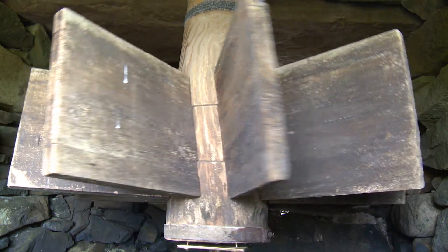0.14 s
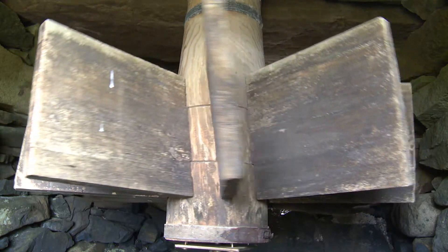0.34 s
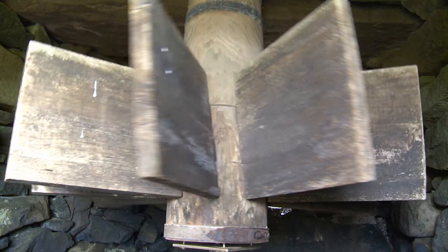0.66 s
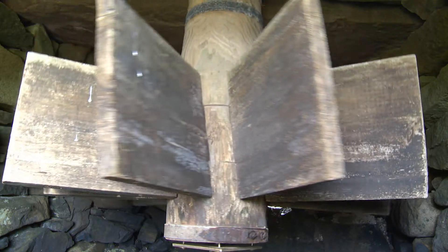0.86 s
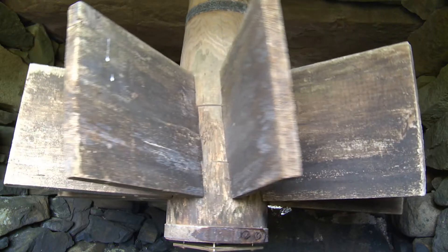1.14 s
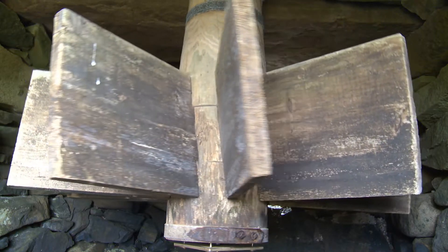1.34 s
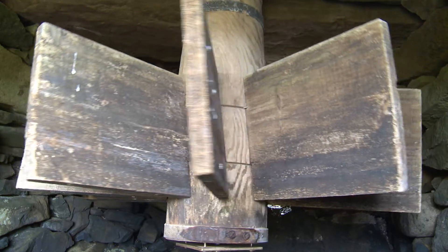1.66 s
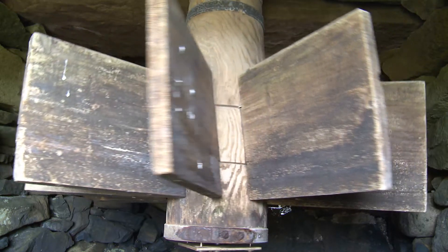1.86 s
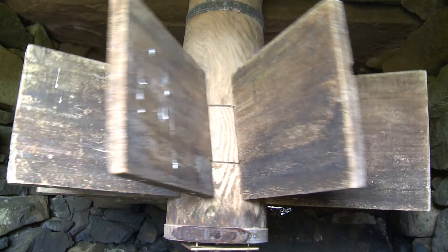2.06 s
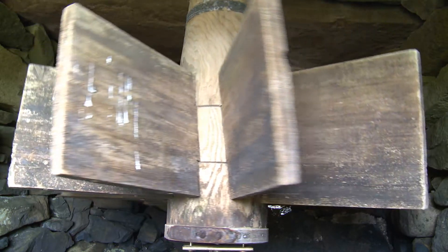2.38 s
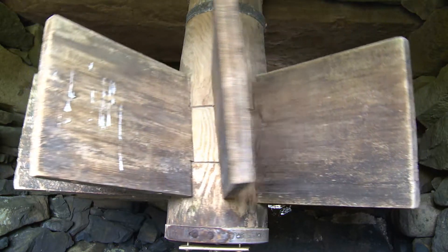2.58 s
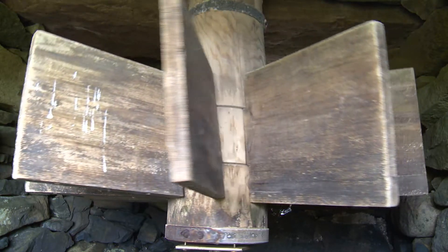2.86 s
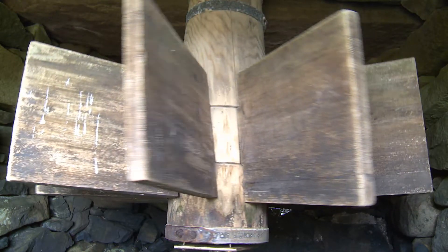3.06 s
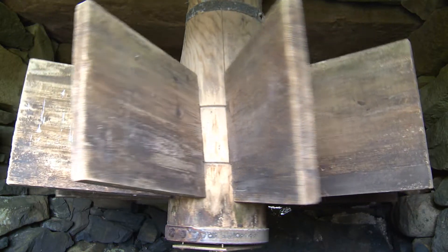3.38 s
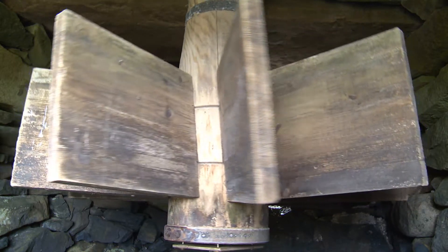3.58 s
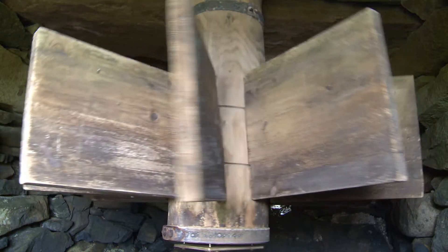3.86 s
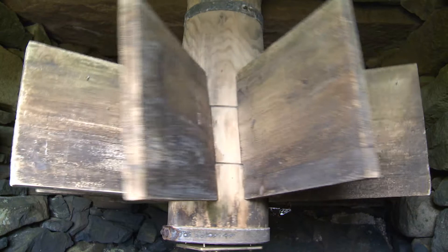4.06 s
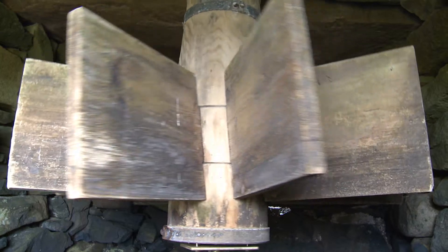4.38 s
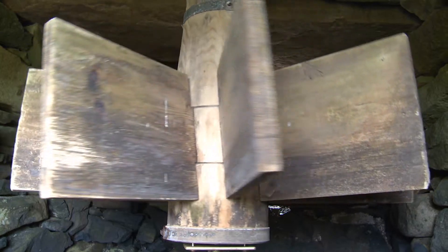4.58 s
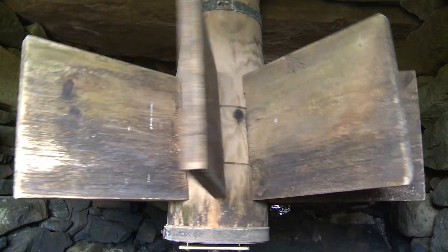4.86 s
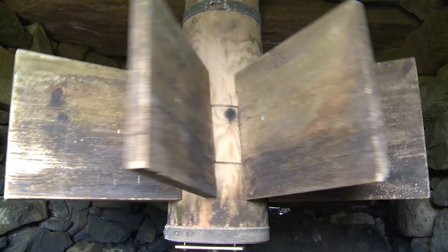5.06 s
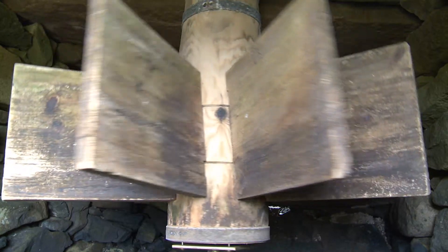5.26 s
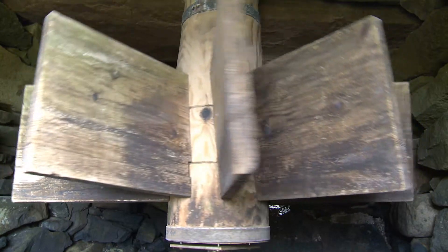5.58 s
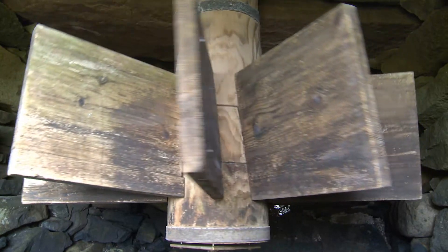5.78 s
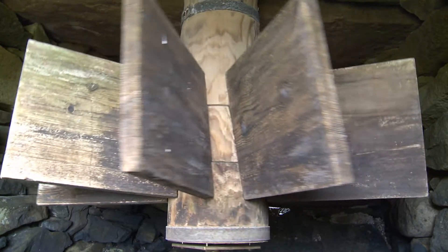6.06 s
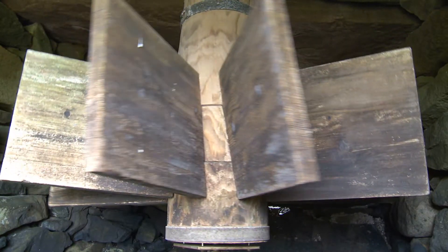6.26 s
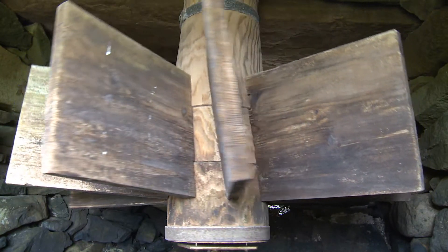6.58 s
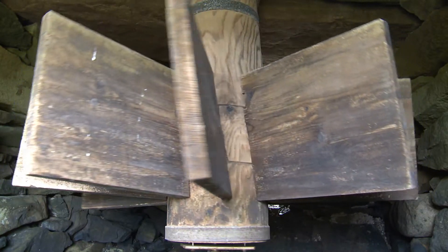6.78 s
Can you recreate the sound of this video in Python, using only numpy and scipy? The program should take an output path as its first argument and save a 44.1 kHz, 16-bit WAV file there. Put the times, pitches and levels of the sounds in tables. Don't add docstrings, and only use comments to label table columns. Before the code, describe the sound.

Under a stone mill, a stream runs continuously past a wooden paddle wheel. Rounded bubbles plop and plink over a steady gurgling rush, with small bright drips and faint spray ticks. A hollow low hum swells and gulps irregularly. Deep wind thumps buffet the bare, close microphone, strongest around the middle. Stone walls add short dull echoes; no wheel creak is heard.

```python
import sys
import numpy as np
from scipy import signal
from scipy.fft import rfft, irfft, next_fast_len
from scipy.io import wavfile
from scipy.ndimage import uniform_filter1d

SR = 44100
rng = np.random.default_rng(int(sys.argv[2]) if len(sys.argv) > 2 else 0)


def linear_from_db(decibels):
    return 10 ** (np.asarray(decibels, float) / 20)


def dump_mix(stems):
    frames = np.atleast_2d(stems).T
    limited = np.clip(frames, -1, 1)
    pcm = np.round(limited * 32767).astype(np.int16)
    wavfile.write(sys.argv[1], SR, pcm)


N = 305524

# pitch_hz, density_db (dB per Hz)
GURGLE_COLOUR = [(140, -13), (240, 3), (311, -10), (443, -6), (530, -12), (729, -8.5), (844, -12),
                 (956, -10.5), (1190, -15), (1410, -13), (2290, -21), (3600, -36), (4680, -39.5),
                 (7920, -120)]


def rms_one(x):
    return x / np.sqrt(np.mean(x ** 2) + 1e-20)


def in_time(rows):
    s, *columns = np.transpose(rows)
    return [np.interp(np.arange(N) / SR, s, column) for column in columns]


def at_hz(points, hz):
    points = np.array(points)
    return np.interp(np.log(hz), np.log(points[:, 0]), points[:, 1])


def filtered(x, order, edge_hz, kind="band"):
    return signal.sosfilt(signal.butter(order, edge_hz, kind, fs=SR, output="sos"), x)


def bumps(when_s, change_db, length_s):
    t = np.arange(0, N + 40, 40) / SR
    total = 0
    for s, db, wide in np.broadcast(when_s, change_db, length_s):
        total = total + db * np.exp(-.5 * ((t - s) / wide) ** 2)
    return np.interp(np.arange(N) / SR, t, total)


def drift(rate):
    r = np.exp(-80 * np.pi * rate / SR)
    slow = signal.lfilter([1], [1, -2 * r, r * r], rng.standard_normal(N // 40 + 2002))[2000:]
    return np.interp(np.arange(N) / 40, np.arange(len(slow)), rms_one(slow))


def evened(x, span_s):
    size = int(span_s * SR)
    power = uniform_filter1d(uniform_filter1d(x ** 2, size=size), size=size)
    return rms_one(x / np.sqrt(power + .02 * power.mean()))


def shaped_noise(spectrum):
    size = next_fast_len(N)
    hz = np.maximum(np.arange(size // 2 + 1) * SR / size, 1)
    coloured = rfft(rng.standard_normal(size)) * linear_from_db(at_hz(spectrum, hz))
    return rms_one(irfft(coloured, size)[:N])


def ring(clicks, hz, t60):
    r, w = linear_from_db(-60 / (t60 * SR)), 2 * np.pi * hz / SR
    return signal.lfilter([0, np.sin(w)], [1, -2 * r * np.cos(w), r * r], clicks + 1e-18)


def strikes_at(events, trim_db):
    strikes = np.zeros(N)
    strikes[[round(s * SR) for s, db in events]] = linear_from_db(np.array(events)[:, 1] + trim_db)
    return strikes


def fading(strikes, t60):
    return signal.lfilter([1], [1, -linear_from_db(-60 / (t60 * SR))], strikes)


def bubbles(events, cycles, swell_cycles, rise, trim_db):
    out = np.zeros(N + SR)
    for (s, peak_db, hz), chance in zip(events, rng.standard_normal((len(events), 2))):
        turns = np.arange(int(1.5 * cycles / hz * SR)) / SR * hz
        shape = (1 - np.exp(-turns / swell_cycles)) * linear_from_db(-60 * turns / cycles)
        phase = turns * (1 + rise * (1 + .5 * chance[0]) * (turns / cycles - .2))
        height = linear_from_db(peak_db + trim_db) * np.sign(chance[1])
        i = round(s * SR)
        out[i:i + len(turns)] += height * shape / shape.max() * np.sin(2 * np.pi * phase)
    return out[:N]


def swarm(spectrum, low_hz, high_hz, per_s, cycles, spread_db, clump_db, count):
    sizes = linear_from_db(spread_db * np.minimum(rng.exponential(1, N), 3.5)) * rng.choice([-1, 1], N)
    born = rng.random(N) < per_s * linear_from_db(clump_db * drift(14)) / SR
    dealt = rng.integers(0, count, N)
    out = np.zeros(N)
    for k, hz in enumerate(np.geomspace(low_hz, high_hz, count)):
        struck = ring(sizes * born * (dealt == k), hz, cycles / hz)
        bubble = ring(struck, hz, 0.17 * cycles / hz)
        out += linear_from_db(at_hz(spectrum, hz)) * np.sqrt(hz) * rms_one(bubble)
    return rms_one(out)


def far_hiss():
    # start_s (middle), lift_db, length_s
    showers = [
        (0.92, 4, .02),
        (3.7, 5, .06),
        (3.87, 5, .04),
        (4.81, 5, 0.055),
        (5.08, 4, .04),
        (6.74, 4, .04),
    ]
    hiss = rms_one(filtered(rng.standard_normal(N), 2, 8000, "high"))
    return linear_from_db(-54.5 + bumps(*np.transpose(showers))) * hiss


def wind():
    # time_s, level_db
    gusts = [(0.0, -20), (0.56, -43), (0.81, -21.5), (1.47, -40), (1.64, -11), (2.37, -35), (2.66, -19),
             (3.03, -20), (3.11, -8), (3.49, -10), (3.65, -5.5), (4.25, -19.5), (4.3, -1), (4.48, -21),
             (4.69, -10.5), (5.86, -15.5), (6.27, -17), (6.93, -52)]
    # time_s, buffeting_change_db, flutter_change_db
    eddies = [(0.155, -9, -2), (0.74, -1, -11), (0.87, 3, 2), (1.37, -4, 12), (1.99, 13, 7), (2.115, 10, 0),
              (2.49, 10, 2), (2.7, 0, 6), (2.83, -7, -12), (3.01, -14, 5), (3.11, 4.5, -1), (3.28, -13, 4),
              (3.47, -9, -14), (3.56, -1, 3), (3.67, 11, -18), (3.84, 6, 0), (4.07, 7, 7), (4.14, 5, 3.5),
              (4.39, 7, -12), (4.6, 5, -13), (4.71, 8, -5), (4.78, 6, 2), (4.86, 10, -3), (5.0, 8.5, 12),
              (5.11, -25, 6.5), (5.19, 10, 3), (5.4, 0, 7), (5.46, -9, -1), (5.52, 14, 11.5), (5.64, -2, 9),
              (5.9, -14, 1), (6.079, 4, -7), (6.13, 4, 5.5), (6.35, 12.5, 10)]
    eddy_s = 0.026
    wind_db, = in_time(gusts)
    s, buffet_up_db, flutter_up_db = np.transpose(eddies)
    buffet_db = wind_db + bumps(s, buffet_up_db, eddy_s)
    flutter_db = -16 + 0.52 * wind_db + bumps(s, flutter_up_db, eddy_s)
    white = rng.standard_normal((2, N + SR))
    big = filtered(white[0], 3, [6, 28.7])[SR:]
    small = filtered(white[1], 1, (45.3, 93))[SR:]
    small = filtered(small, 2, 170, "low")
    push = linear_from_db(buffet_db - 3.5) * evened(big, 0.19) + linear_from_db(flutter_db - 3.0) * evened(small, 0.13)
    return .88 * np.tanh(push / .88)


def hollow():
    # time_s, change_db
    surges = [(0.19, 11), (0.48, 4), (0.54, -7), (0.65, 7), (1.14, -16), (1.23, 4.5), (1.33, -17),
              (1.54, 4.5), (1.775, -6), (1.836, 3), (2.2, 6), (2.29, -14), (2.95, 5.5), (3.05, 5.5),
              (3.1, -7), (3.26, 8), (3.41, -18), (3.53, 4), (3.71, 19), (3.83, -22), (3.9, 26), (3.97, 22),
              (4.19, 11), (4.23, -5), (4.395, 5), (4.73, 10), (5.0, 5.5), (5.33, 6), (5.46, 19), (5.61, -6),
              (5.73, 6.5), (5.86, 5), (6.02, 21), (6.105, -5), (6.17, 8), (6.33, 4), (6.39, -10),
              (6.455, 3), (6.6, -26)]
    hollow_hz, width_hz, surge_s = 196, 18.7, 0.026
    boom_db = -23.5 + bumps(*np.transpose(surges), surge_s)
    t60 = np.log(1000) / (np.pi * width_hz * 1.5)
    boom = ring(ring(rng.standard_normal(N), hollow_hz, t60), hollow_hz, t60)
    return linear_from_db(np.minimum(boom_db, -17) - 1.5) * evened(boom, 0.091)


def gulps():
    # start_s, peak_db, pitch_hz
    pockets = [
        (0.172, -7, 195),
        (1.371, -3.5, 189),
        (1.58, -6, 196),
        (3.868, -11.5, 223),
        (6.518, -10.5, 194),
    ]
    out = np.zeros(N + SR)
    t = np.arange(SR // 5) / SR
    for s, peak_db, hz in pockets:
        shape = np.clip(t / 0.005, 0, 1) * linear_from_db(-60 * np.maximum(t - .018, 0) / 0.077)
        out[round(s * SR) - 150:][:len(t)] += linear_from_db(peak_db) * shape * np.sin(2 * np.pi * hz * t)
    return out[:N]


def babble(count):
    when, size, strength = rng.random((count, 3)).T
    hz = 320 * 10.6 ** size
    level_db = at_hz(GURGLE_COLOUR, hz) + 9 * np.log10(hz / 1000) - 2.8 * np.log(strength + 0.11)
    events = np.c_[when * N / SR, level_db, hz]
    return rms_one(bubbles(events, cycles=26.4, swell_cycles=0.59, rise=0.25, trim_db=0))


def gurgle():
    foam = swarm(GURGLE_COLOUR, 289.7, 3590, per_s=700, cycles=49.0, spread_db=1.63, clump_db=2.4, count=36)
    return linear_from_db(-2.5) * shaped_noise(GURGLE_COLOUR) + linear_from_db(-3) * foam + linear_from_db(-11.0) * babble(count=900)


def spatter(spectrum, flicker_db, per_s):
    white, together, out = shaped_noise(spectrum), drift(per_s), 0
    for low_hz, high_hz in [(2600, 5200), (5200, 9000), (9000, 16000)]:
        octave = filtered(white, 2, [low_hz, high_hz])
        flicker = np.minimum(together + drift(per_s), 2.5)
        out = out + octave * linear_from_db(flicker_db * (4000 / low_hz) ** 0.079 * flicker)
    return rms_one(out)


def spray():
    # pitch_hz, density_db (dB per Hz)
    colour = [(1760, -56), (3000, -22), (3740, -2.5), (4380, 1), (8160, -5), (9050, -9.5), (11800, -10.5),
              (15600, -14)]
    mist = swarm(colour, 3340, 13060, per_s=620, cycles=38, spread_db=3.0, clump_db=6.0, count=24)
    bursts = spatter(colour, flicker_db=20, per_s=59)
    return linear_from_db(-1.5) * shaped_noise(colour) + linear_from_db(-3.5) * mist + linear_from_db(-6.5) * bursts


def churned(rush):
    bright = filtered(rush, 1, (900, 5330))
    return rush + bright * (linear_from_db(1.56 * drift(29) - 0.24) - 1)


def stream_rush():
    # time_s, level_db
    flow = [
        (0, -24),
        (.5, -24.5),
        (1.7, -25),
        (2.6, -24.5),
        (3.7, -24.5),
        (4.9, -23.5),
        (5.7, -24.5),
        (6.75, -24),
        (6.93, -25.5),
    ]
    # time_s, above_steady_db, length_s
    splashes = [(0.02, 4.5, 0.012), (0.17, 2, .03), (0.577, 2, 0.022), (1.285, 3.5, .02),
                (1.513, 4.5, .015), (1.665, 4, .02), (1.84, 4, 0.022), (2.03, 4.5, 0.033), (2.39, 3, 0.046),
                (2.633, 5.5, 0.034), (3.3, 2, 0.044), (3.645, 2, 0.085), (4.79, 1.5, 0.04),
                (5.15, -4, .015), (6.403, 4, 0.034), (6.744, 4.5, 0.013)]
    flow_db, = in_time(flow)
    spray_db = flow_db - 26.5 + bumps(*np.transpose(splashes))
    rush = linear_from_db(flow_db + 0.57) * gurgle() + linear_from_db(spray_db + 2.0) * spray()
    return filtered(churned(rush), 4, 45, "high")


def flecks():
    born = (rng.random(N) < 30 / SR) * linear_from_db(7.8 * np.minimum(rng.exponential(1, N), 2.2))
    puff = filtered(fading(born, 0.008) * rng.standard_normal(N), 2, (3000, 14000))
    return linear_from_db(-60.5) * rms_one(signal.lfilter([1], [1, -.6], puff))


def slaps():
    # start_s, peak_db
    smacks = [(0.0218, -19), (0.18, -16), (0.4045, -25), (0.5795, -24), (2.1093, -16), (2.377, -26),
              (2.7087, -30), (3.3303, -26), (3.6795, -25), (4.0472, -21), (4.1465, -26), (4.186, -25),
              (4.3555, -28), (4.4772, -21), (4.7506, -28), (5.0836, -27), (5.1357, -30), (5.634, -21),
              (5.672, -30), (5.9264, -26)]
    puff = rms_one(filtered(rng.standard_normal(N), 2, (1900, 5000)))
    return fading(strikes_at(smacks, -13.5), 0.031) * puff


def pricks():
    # start_s, peak_db
    mist_drops = [(0.1301, -37), (0.5437, -37), (0.7921, -34), (0.8649, -35), (0.9248, -34), (1.2067, -34),
                  (1.4975, -35), (2.3745, -35), (2.4099, -32), (2.4528, -34), (2.4972, -37), (2.8903, -36),
                  (3.3448, -32), (4.5341, -34), (4.8666, -31), (5.0564, -31), (5.1118, -32), (5.6885, -30),
                  (5.893, -34), (6.0262, -29), (6.3026, -29), (6.3325, -35)]
    crackle = rng.choice([-1, 1], 200) * linear_from_db(-0.16 * np.arange(200))
    crackles = np.convolve(strikes_at(mist_drops, 2.0), crackle)[:N]
    return filtered(crackles, 2, (9000, 15500))


def ticks():
    # start_s, peak_db
    bursts = [(0.0214, -38), (0.18, -36), (0.2428, -32), (0.4597, -31), (0.5575, -28), (0.793, -31),
              (0.8894, -37), (1.209, -26), (1.288, -33), (1.498, -25), (1.8634, -34), (2.0297, -27),
              (2.3141, -28), (2.374, -32), (2.4972, -30), (2.6716, -29), (2.726, -26), (2.8739, -33),
              (3.2435, -33), (3.3418, -29), (3.5084, -34), (3.6531, -35), (3.774, -27), (4.535, -28),
              (5.6891, -29), (5.8925, -31), (6.027, -31), (6.0502, -35), (6.3774, -27), (6.7221, -33)]
    struck = strikes_at(bursts, -5.5)
    coin = rng.integers(0, 2, N)
    out = 0
    for strikes, band_hz in [(struck * coin, (5600, 7500)), (struck * (1 - coin), (6500, 15500))]:
        bright = filtered(rng.standard_normal(N), 2, band_hz)
        out = out + fading(strikes, 0.007) * rms_one(bright)
    return out


def brook():
    # start_s, peak_db, pitch_hz
    glugs = [(0.082, -13.5, 388), (0.192, -17.5, 456), (0.284, -18, 688), (0.324, -17.5, 760),
             (0.472, -18, 806), (0.499, -19, 740), (0.692, -18.5, 665), (0.774, -14, 397),
             (1.439, -17.5, 450), (1.868, -14, 400), (2.015, -18, 700), (2.328, -22, 470),
             (2.345, -14.5, 694), (2.474, -17, 421), (2.532, -11.5, 810), (2.591, -15, 410),
             (2.677, -19, 430), (3.095, -17, 406), (3.161, -17, 582), (3.286, -17, 734), (3.35, -18, 886),
             (3.58, -17, 780), (3.615, -16, 480), (3.748, -20, 790), (3.787, -19, 806), (4.062, -12, 315),
             (4.409, -18, 614), (4.558, -17, 536), (4.731, -15, 640), (4.75, -14, 605), (4.906, -20, 467),
             (5.133, -13.5, 855), (5.381, -18, 865), (5.504, -17, 637), (5.737, -16.5, 427),
             (5.78, -15.5, 840), (5.882, -17.5, 436), (5.957, -21, 830), (6.03, -13.5, 703),
             (6.204, -17, 822), (6.286, -15.5, 455), (6.758, -16, 856), (6.888, -18, 433)]
    # start_s, peak_db, pitch_hz
    burbles = [(0.027, -17.5, 1330), (0.945, -19, 1890), (1.061, -21, 1810), (1.155, -18, 952),
               (1.167, -20, 1690), (1.261, -18, 1780), (1.413, -20, 1700), (1.472, -17.5, 1800),
               (1.659, -18, 1720), (1.783, -20, 1290), (1.803, -21, 1760), (1.831, -18, 1770),
               (1.898, -18.5, 1250), (2.024, -18, 983), (2.059, -16, 1400), (2.103, -14, 1290),
               (2.35, -18.5, 1400), (2.436, -18.5, 1080), (2.618, -17.5, 1720), (2.674, -16, 1380),
               (2.82, -18, 1350), (2.978, -19, 1470), (3.355, -19, 900), (3.37, -22, 1690),
               (3.432, -20, 1330), (3.779, -15, 1650), (3.996, -20, 1420), (4.019, -17.5, 1010),
               (4.028, -13, 1760), (4.099, -17, 1210), (4.266, -19, 1410), (4.342, -21, 984),
               (4.715, -18, 1770), (4.761, -19, 1770), (4.837, -16, 1300), (5.113, -16, 1260),
               (5.192, -24, 1410), (5.24, -17.5, 1390), (5.299, -15.5, 1774), (5.719, -22, 1590),
               (5.79, -22, 1830), (5.887, -19, 900), (6.095, -18.5, 1490), (6.188, -22, 1800),
               (6.445, -19, 1050), (6.506, -15, 1550), (6.643, -18, 1670), (6.659, -19, 1880),
               (6.913, -23, 1410),
               (0.5247, -21, 1230), (0.6864, -22.5, 2110), (1.0914, -21, 1330), (1.2704, -19.5, 1960),
             (1.4804, -15.5, 1360), (1.8776, -19, 1260), (2.5934, -16.5, 1200), (3.2914, -19, 1420),
             (3.9354, -21, 2250), (4.5374, -25, 1180), (5.3884, -17, 1380), (6.3046, -19, 1270)]
    # start_s, peak_db, pitch_hz
    specks = [(0.022, -30, 6030), (0.16, -35, 8820), (0.459, -31, 6760), (0.539, -33, 3750),
              (0.561, -36, 8450), (0.581, -30, 3300), (0.594, -25, 2720), (1.277, -38, 8120),
              (1.498, -31, 7400), (1.89, -34, 5950), (2.029, -33, 5810), (2.032, -30, 7170),
              (2.386, -33, 5660), (2.396, -17, 2030), (2.402, -33, 4450), (2.871, -31, 3090),
              (3.244, -32, 6360), (3.439, -34, 4340), (3.455, -28, 2900), (3.487, -28, 3000),
              (3.508, -35, 8230), (3.654, -31, 5700), (3.679, -28, 3160), (4.185, -28, 2490),
              (4.75, -26, 2600), (4.826, -34, 5400), (4.837, -32, 3640), (4.849, -21, 2070),
              (5.343, -33, 4450), (5.64, -32, 5030), (5.738, -37, 6360), (5.893, -35, 7900),
              (5.928, -24.5, 2720), (5.983, -30, 3050), (6.026, -30, 8050), (6.568, -34, 4010),
              (0.1002, -34, 5270), (0.3252, -31, 2840), (2.3057, -29, 2920), (3.5783, -32, 2820),
              (5.9034, -29, 2850), (5.9618, -31, 3090), (6.1769, -33, 2850)]
    out = bubbles(glugs, cycles=29, swell_cycles=0.81, rise=0.11, trim_db=-2.0)
    out += bubbles(burbles, cycles=50, swell_cycles=1.45, rise=0.1, trim_db=-1.05)
    return out + bubbles(specks, cycles=45, swell_cycles=0.66, rise=0.23, trim_db=1.0)


def near_bubbles():
    # start_s, peak_db, pitch_hz
    plops = [(0.143, -8.5, 392), (0.36, -9.5, 686), (0.912, -9.5, 594), (1.063, -12.5, 388),
             (1.258, -10.5, 680), (1.295, -13, 1020), (1.527, -5, 343), (2.026, -13, 587),
             (2.112, -8, 1000), (2.25, -4.5, 608), (2.395, -2, 962), (2.873, -5, 394), (3.129, -6.5, 697),
             (3.265, -6, 674), (3.344, -11, 877), (3.575, -10.5, 604), (3.936, -8.5, 692), (4.497, -9, 604),
             (4.721, -7, 564), (4.822, -4, 946), (5.021, -8, 970), (5.106, -7.5, 743), (5.226, -9, 734),
             (5.405, -10, 750), (5.61, -8, 367), (5.96, -11, 475), (6.031, -1, 413), (6.284, -7, 825),
             (6.497, -9, 1050), (6.697, -6.5, 975)]
    # start_s, peak_db, pitch_hz
    plinks = [(0.2828, -10, 1400), (0.3271, -8.5, 1440), (1.0323, -12, 1440), (1.1335, -14, 1400),
              (1.1643, -13, 1440), (1.2984, -10, 1480), (1.3476, -15.5, 1740), (1.467, -13, 1440),
              (1.5374, -12.5, 1730), (2.0892, -18, 1420), (2.4244, -9.5, 1860), (2.499, -10, 1390),
              (2.7611, -10, 1900), (3.2343, -13, 1680), (3.7342, -12, 1570), (3.7694, -12.5, 1780),
              (4.0716, -11, 1515), (4.247, -12, 1490), (4.4784, -9, 1590), (5.055, -12.5, 1620),
              (5.3805, -8, 1480), (5.5243, -14, 1340), (5.5578, -8.5, 1324), (5.6326, -13, 1280),
              (6.24, -17, 1300), (6.4278, -13.5, 1380), (6.5087, -15, 1260), (6.7075, -11, 1530),
              (6.7282, -8, 1220), (6.757, -8.5, 1646)]
    # start_s, peak_db, pitch_hz
    glides = [
        (6.065, -12.5, 870),
        (4.071, -24, 310),
        (1.3, -21.5, 300),
        (4.8, -22, 580),
    ]
    # start_s, peak_db, pitch_hz
    pings = [(0.0223, -10, 2400), (0.1386, -14, 2400), (0.1825, -5.5, 1990), (0.404, -11, 2290),
             (0.6195, -8.5, 2100), (0.9018, -8, 2100), (1.035, -9, 2120), (1.061, -13, 2180),
             (1.1278, -8, 2140), (1.696, -10, 2060), (2.377, -10, 2620), (2.388, -5, 2270),
             (2.7077, -7, 2370), (3.3308, -7.5, 2270), (3.455, -7, 2010), (3.714, -11, 2060),
             (3.7678, -8, 2060), (3.8556, -10, 2330), (3.9594, -10, 2150), (4.0183, -8, 2120),
             (4.0457, -3, 2010), (4.1465, -6.5, 2440), (4.1854, -18, 2510), (4.2033, -10, 2140),
             (4.356, -4, 2350), (4.7511, -11, 2030), (5.1337, 0, 2120), (5.6331, -10, 2350),
             (5.672, -13, 2530), (6.8922, -12, 2300)]
    # start_s, peak_db, pitch_hz
    drops = [(0.0224, -33, 4130), (0.18, -26, 4270), (0.2668, -21, 3600), (0.2882, -22, 4400),
             (1.2085, -30, 6300), (1.6666, -25, 5435), (1.8971, -25, 4070), (2.0304, -20.5, 4440),
             (2.1211, -24, 4310), (2.386, -24, 4700), (2.4743, -23, 4700), (2.649, -18, 4320),
             (2.7362, -22, 3660), (2.7751, -30, 3340), (2.8105, -26, 4360), (3.3194, -27, 4450),
             (3.6425, -21, 4600), (3.689, -20, 3230), (4.207, -21, 3450), (4.2502, -22, 4550),
             (4.587, -24, 4260), (5.0828, -19, 3230), (5.1063, -22, 3240), (5.147, -20, 4980),
             (5.2066, -22.5, 3460), (5.456, -25, 4400), (5.6072, -25, 3500), (6.2911, -22, 4020),
             (6.4073, -17, 4500), (6.5959, -24, 4370)]
    out = bubbles(plops, cycles=37.5, swell_cycles=1.2, rise=0.031, trim_db=-8.0)
    out += bubbles(plinks, cycles=57.3, swell_cycles=0.64, rise=0.27, trim_db=-4.0)
    out += bubbles(glides, cycles=86, swell_cycles=10.0, rise=0.57, trim_db=-2.5)
    out += bubbles(pings, cycles=41, swell_cycles=0.49, rise=0.17, trim_db=-12.0)
    return out + bubbles(drops, cycles=39, swell_cycles=0.92, rise=0.27, trim_db=-6.5)


def walls(x):
    # delay_s, level_db
    echoes = [(.011, -8), (0.0185, -26.5), (0.028, -13), (.043, -24.5)]
    dull = filtered(x, 1, 1600, "low")
    return sum(linear_from_db(db) * np.pad(dull, (round(s * SR), 0))[:N] for s, db in echoes)


def scene():
    hiss = far_hiss() * linear_from_db(2.5 * drift(32))
    around = wind() + stream_rush() + flecks() + slaps()
    boom = hollow() + gulps()
    near = near_bubbles() + ticks() + brook() + pricks()
    return (near + walls(near) + boom + around + hiss)[None]


def top_cut(x):
    return signal.sosfilt(signal.butter(12, 15740, fs=SR, output="sos"), x)


def record(dry):
    rounded = dry / (1 + np.abs(dry) ** 12) ** (1 / 12)
    return top_cut(rounded)


dry = scene()
out = record(dry)
dump_mix(out)
```